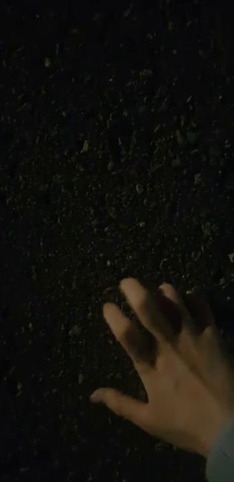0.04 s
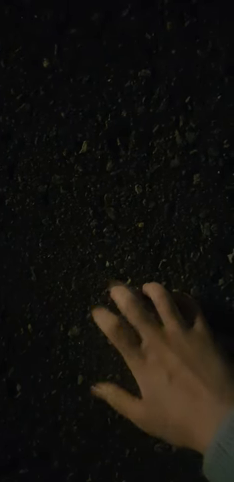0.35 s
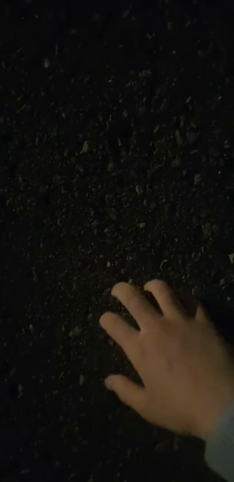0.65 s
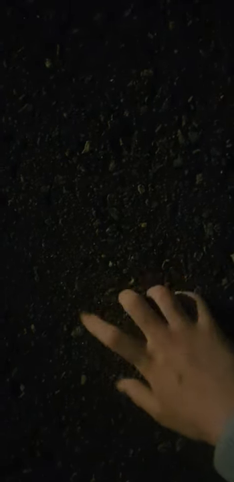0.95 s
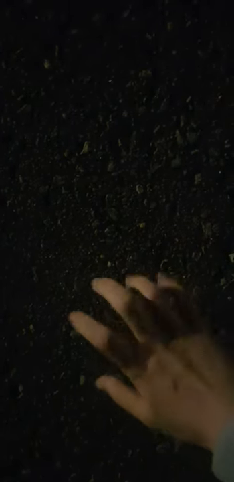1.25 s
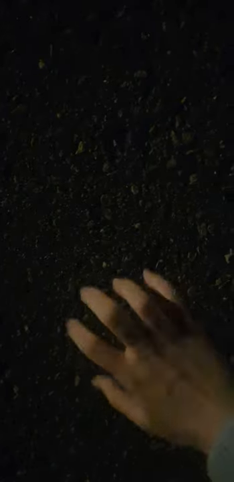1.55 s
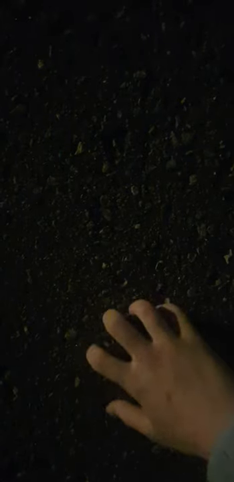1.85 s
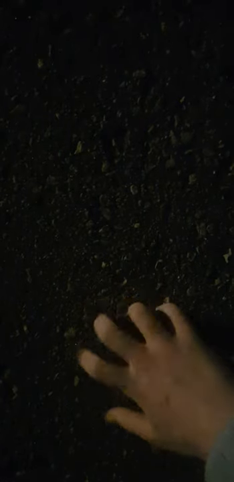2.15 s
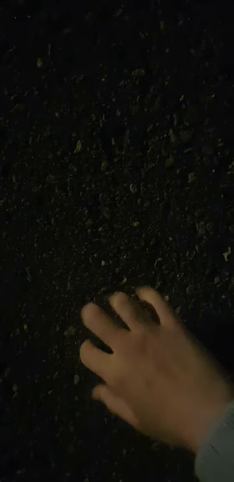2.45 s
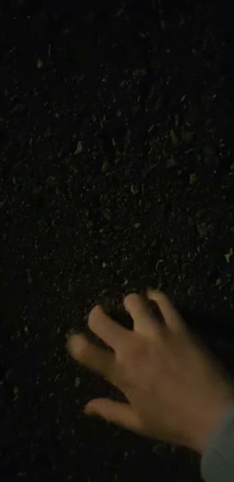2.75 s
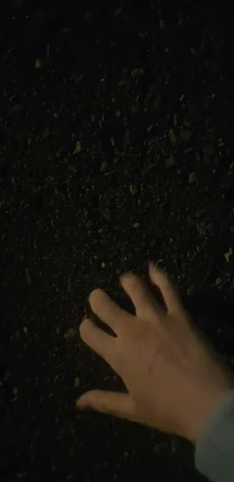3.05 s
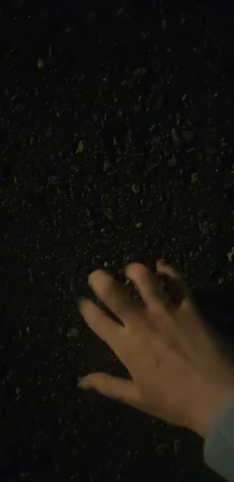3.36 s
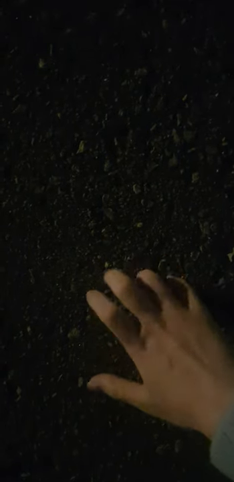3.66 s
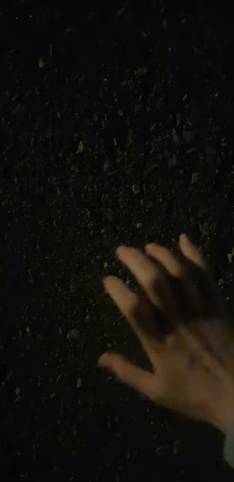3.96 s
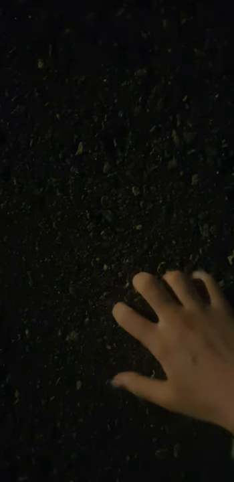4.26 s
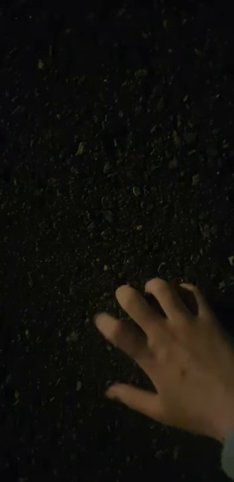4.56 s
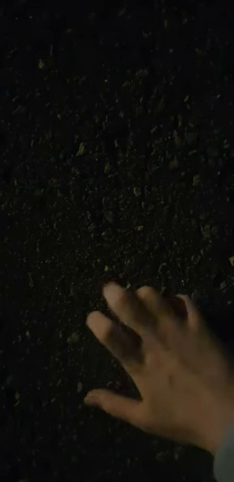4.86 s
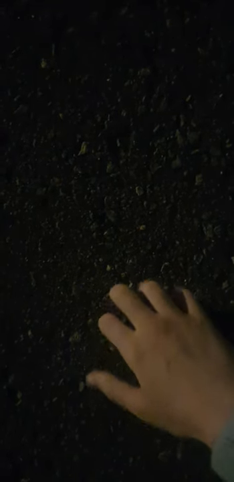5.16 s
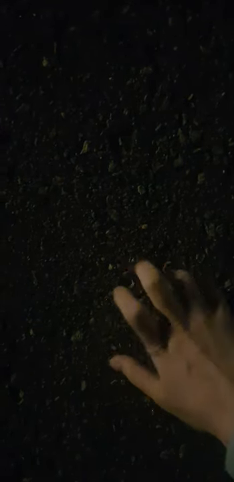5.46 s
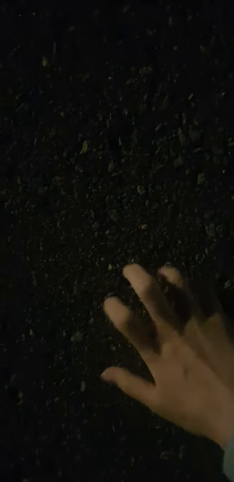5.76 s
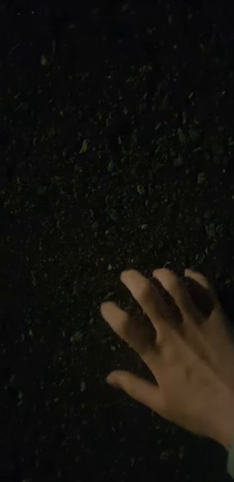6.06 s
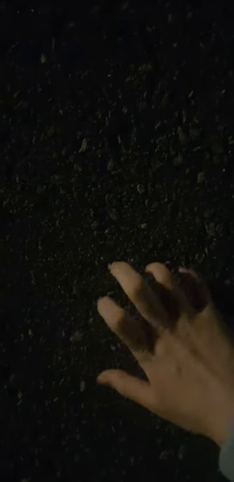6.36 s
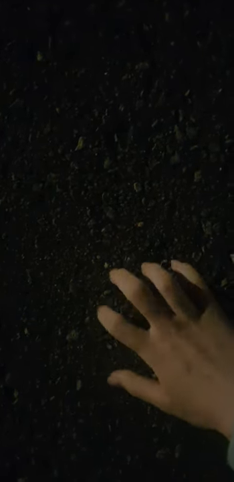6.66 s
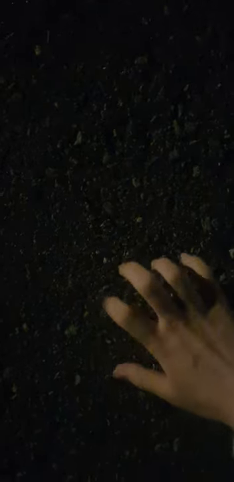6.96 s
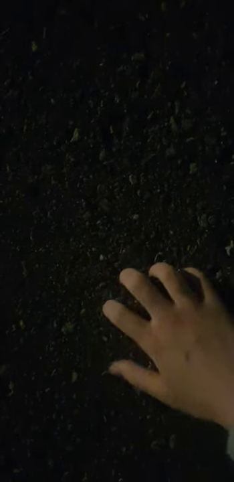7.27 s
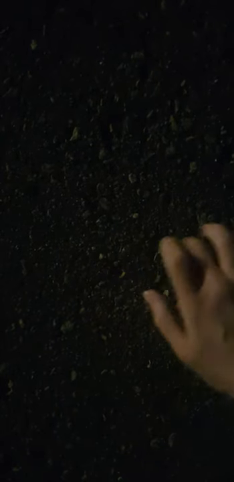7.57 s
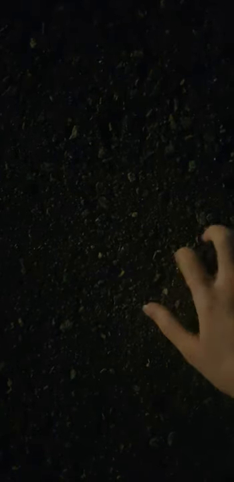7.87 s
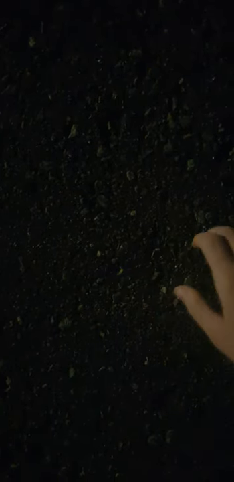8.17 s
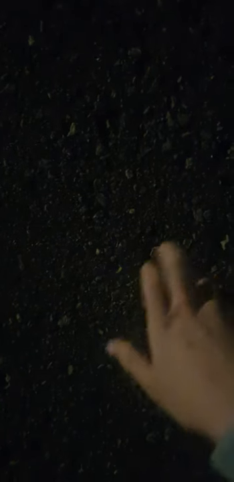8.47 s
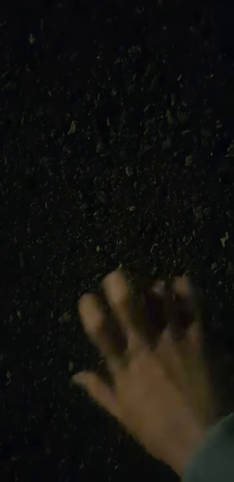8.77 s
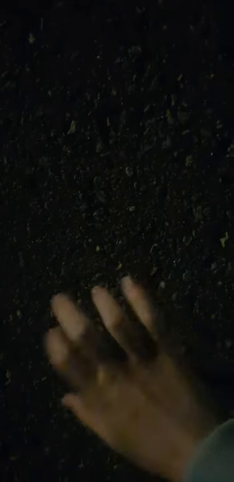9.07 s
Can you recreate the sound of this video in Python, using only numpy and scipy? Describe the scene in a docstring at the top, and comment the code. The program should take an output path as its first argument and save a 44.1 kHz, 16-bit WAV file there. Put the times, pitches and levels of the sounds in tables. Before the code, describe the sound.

Fingernails drum on rough pavement in quick little rolls, close up, while crickets chirp over a low town rumble at night.

```python
"""A low town rumble, a mains hum and a soft hiss fill the night air, with a distant insect trill.
Crickets chirp in threes over a far chorus, by stridulation: one wing's file drags over a scraper.
Almost at once, fingernails drum on rough pavement in quick rolls, close to the microphone.
Each impact gives a dull knock of the fingertip, a bright ring of the nail and a snap of grit,
followed by faint reflections from the yard."""
import sys
import numpy as np
from scipy import signal
from scipy.fft import rfft, irfft
from scipy.io import wavfile

SR = 44100
rng = np.random.default_rng(int(sys.argv[2]) if len(sys.argv) > 2 else 0)


def to_wav(sig):
    """Store sig (one row per channel, or 1-D mono) as 16-bit WAV at the path in sys.argv[1].

    Samples outside -1..1 are clipped; the rate is SR.
    """
    pcm = np.clip(np.atleast_2d(sig), -1, 1) * 32767
    pcm = np.round(pcm).astype(np.int16)
    wavfile.write(sys.argv[1], SR, pcm.T)  # frames by channels


N = 411012


def amp(db):
    """Amplitude ratio of a level in decibels."""
    return 10 ** (np.asarray(db) / 20)


def unit_rms(x):
    """Normalisation to a mean power of 1."""
    return x / np.sqrt(np.mean(np.abs(x) ** 2) + 1e-20)


def spectrum_at(points, hz, column=1):
    """Interpolation of a spectrum table on a log-frequency axis."""
    table = np.transpose(points)
    return np.interp(np.log(hz + 1), np.log(table[0] + 1), table[column])


def add(mix, onset, sound):
    """Superposition: a stereo sound joins the mix at its onset, in seconds."""
    start = round(onset * SR)
    sound = sound[:, max(-start, 0):]
    part = mix[:, max(start, 0):][:, :sound.shape[1]]
    part += sound[:, :part.shape[1]]


def drift(rate_hz, size):
    """Random modulation: low-passed Gaussian noise of rms 1."""
    hz = np.fft.rfftfreq(size, 1 / SR)
    return unit_rms(irfft(rfft(rng.standard_normal(size)) * np.exp(-(hz / rate_hz) ** 2), size))


def panned(db):
    """Constant-power panning: two gains, the left db above the right."""
    return unit_rms(amp([[db / 2], [-db / 2]]))


# Spectral densities of the town's rumble and the night's hiss: f/Hz, left level/dB, right level/dB
TOWN_RUMBLE = [(15.1, -110, -110), (28, -90.5, -92), (41, -85, -85), (56.7, -75, -74), (84.5, -72.5, -71.5),
               (103, -75, -75), (150.5, -74.5, -74), (254, -81, -79.5), (437, -93.5, -83.5),
               (487, -95, -90), (696, -104, -104), (1040, -112, -112), (3000, -130, -130)]
AIR_HISS = [(520, -125, -125), (1090, -113, -113), (1660, -112, -114), (2500, -111, -114),
            (2570, -115, -117), (3480, -121, -122), (4110, -108, -111), (4500, -104, -103),
            (4900, -103, -107), (5620, -120, -125), (7250, -127.5, -130), (8800, -131, -133),
            (10560, -125, -127), (11200, -118, -118), (15800, -117.5, -117.5), (16050, -145, -145)]
# Likeness of the two channels: f/Hz, correlation (0 to 1)
COHERENCE = [(50, 0.95), (250, 0.96), (420, 0.82), (600, 0), (1200, 0), (8000, 0.02)]


def ambient_noise(spectrum, swell_db):
    """Partial coherence: gently swelling noise, alike in both channels only in the bass."""
    hz = np.fft.rfftfreq(N, 1 / SR)
    common, independent = rfft(rng.standard_normal((2, N))) * np.sqrt(SR / 2)
    coherence = np.clip(spectrum_at(COHERENCE, hz), -1, 1)
    blend = coherence * common + np.sqrt(1 - coherence ** 2) * independent
    left = common * amp(spectrum_at(spectrum, hz, column=1))
    right = blend * amp(spectrum_at(spectrum, hz, column=2))
    return irfft(np.array([left, right]), N) * amp(swell_db * drift(14, N))


# Tones of far machines: f/Hz, level/dB
HUM_TONES = [(56, -63.5), (120.5, -58.5), (576.3, -82)]


def machine_hum(waver_db=3.5, wander_hz=1.287):
    """Amplitude and frequency modulation: low machine tones waver with distance."""
    out = np.zeros(N)
    for hz, db in HUM_TONES:
        cycles = np.cumsum(hz + wander_hz * drift(4.1, N)) / SR
        out += amp(db + waver_db * drift(3.55, N)) * unit_rms(np.sin(2 * np.pi * cycles))
    return out


# Envelope of the far insect trill: t/s, relative level/dB
TRILL_ENVELOPE = [(0, -80), (2.6, -84), (3.1, -76.5), (3.9, -84.5), (4.4, -79.5), (5.3, -83.5), (5.9, -80),
                  (7, -77.5), (9.3, -85.5)]


def insect_trill(centre_hz=2080, wander_hz=45, spread_hz=190, gain_db=-2):
    """Narrow-band noise: very distant insects merge into one soft band that wanders in pitch."""
    carrier = np.exp(2j * np.pi * np.cumsum(centre_hz + wander_hz * drift(.6, N)) / SR)
    baseband = np.array([drift(spread_hz, N) + 1j * drift(spread_hz, N) for channel in range(2)])
    level_db = gain_db + np.interp(np.arange(N) / SR, *np.transpose(TRILL_ENVELOPE))
    return panned(7.2) * amp(level_db) * (baseband * carrier).real


def wing_stroke(db, hz, fall_hz, length_s):
    """Stridulation, as a complex tone: the file slows on the scraper, so the pitch droops at the end."""
    size = int(length_s * SR)
    pitch_hz = hz - fall_hz * np.linspace(0, 1, size) ** 3.2 + 24 * drift(250, size)
    envelope = signal.windows.tukey(size, .6) * (1 + .17 * drift(350, size))
    return amp(db) * unit_rms(envelope * np.exp(2j * np.pi * np.cumsum(pitch_hz) / SR))


# Each cricket's base song: level/dB, f/Hz, pitch fall/Hz, stroke length/s, spacing ratio, left-right/dB
NEAREST = (-49, 4330, 660, .037, 1.0, 13)
SLOW = (-53.6, 4460, 450, .028, 1.1, 2)
FAINT_LOW = (-62.5, 4270, 380, .026, 1.0, 4)
FAINT_HIGH = (-61.5, 4850, 420, .028, 1.0, 4)
# When each one chirps: cricket, list of t/s of each chirp's last stroke
CHIRP_TIMES = [(NEAREST, [.824, 1.58, 2.3, 3.484, 4.147, 5.1, 6.017, 6.728, 7.305, 8.527, 9.117]),
               (SLOW, [1.367, 4.659, 6.315, 8.733]),
               (FAINT_LOW, [.049, .936, 1.71, 2.03, 2.721, 3.68, 5.615, 7.086, 8.08]),
               (FAINT_HIGH, [0.941, 2.464, 3.987, 5.211, 6.337, 7.776, 9.03])]
# The three strokes of a chirp: t/s before the last, relative level/dB, pitch ratio, length ratio
CHIRP_STROKES = [(.102, -3.3, .975, .76), (.058, 0, .995, .94), (0, .5, 1, 1)]


def crickets(rise_db_per_s=0.17):
    """Level and phase differences set four crickets apart in direction; all grow slowly louder."""
    out = np.zeros((2, N))
    for (db, hz, fall_hz, length_s, spacing, side_db), times in CHIRP_TIMES:
        direction = panned(side_db) * np.exp([[0], [-.15j * side_db]])
        for last_s in times:
            chirp_db = db + rise_db_per_s * (last_s - N / SR / 2)
            for lead_s, stroke_db, pitch, stretch in CHIRP_STROKES:
                droop_hz = fall_hz * stretch ** 2  # short strokes droop less
                tone = wing_stroke(chirp_db + stroke_db, hz * pitch, droop_hz, length_s * stretch)
                add(out, last_s - lead_s * spacing, (direction * tone).real)
    return out


def cricket_chorus(count=300, low_hz=4420, high_hz=4710, high_db=-4, level_db=-69, swell_db=1.3):
    """Incoherent summation: many far chirps around two pitches merge, blurred by the yard."""
    out = np.zeros((2, N))
    times = (np.arange(count) + rng.random(count)) * (N / SR + CHIRP_STROKES[0][0]) / count
    for k, (last_s, (nearness, detune, side)) in enumerate(zip(times, rng.standard_normal((count, 3)))):
        hz, db = (high_hz, high_db) if k % 4 == 0 else (low_hz, 0)
        for lead_s, stroke_db, pitch, stretch in CHIRP_STROKES:
            tone = wing_stroke(db + stroke_db + 2 * nearness, (hz + 95 * detune) * pitch,
                               fall_hz=300, length_s=.024 * stretch)
            add(out, last_s - lead_s, panned(4 * side) * tone.real)
    blurred = unit_rms(0.99 * out + yard(out, t60=0.36))
    return panned(8.5) * amp(level_db + swell_db * drift(0.49, N)) * blurred


def yard(x, t60, build_s=0.014, echoes_per_s=4000):
    """Reverberation: echoes scattered by walls and plants build up, then decay exponentially."""
    t = np.arange(SR // 2) / SR
    echoes = rng.standard_normal((2, len(t))) * (rng.random((2, len(t))) < echoes_per_s / SR)
    echoes *= (1 - np.exp(-t / build_s)) * np.exp(-np.log(1000) * t / t60)
    echoes /= np.linalg.norm(echoes, axis=1, keepdims=True)
    return signal.fftconvolve(x, echoes, axes=1)[:, :N]


def minimum_phase(gain):
    """Minimum-phase response: the shortest causal click with this magnitude spectrum."""
    log_gain = np.log(np.maximum(np.r_[gain, gain[-2:0:-1]], 1e-5))
    return np.fft.ifft(np.exp(np.conj(signal.hilbert(log_gain)))).real


def impact(gain, db, grains, skid_s, width):
    """Source and filter: a blow and a skid over stone grains, shaped by gain; db is the level over 3 ms."""
    t = np.arange(128) / SR
    skid = rng.standard_normal((3, len(t))) * np.exp(-t / skid_s)
    skid /= np.linalg.norm(skid, axis=1, keepdims=True)
    force = (t == 0) + grains * skid[0] + width * skid[1:]  # each channel hears the grains differently
    click = signal.fftconvolve(force, minimum_phase(gain)[None], axes=1)
    power = (click ** 2).sum() / 2 / (.003 * SR)
    return amp(db) * click / np.sqrt(power)


def bright_level(law, force_db, nail_db, usual_force_db=-52):
    """Power law: the level of a ring or snap is linear in the force and nail share, both in dB."""
    offset_db, per_nail, per_force = law
    return force_db + offset_db + per_nail * nail_db + per_force * (force_db - usual_force_db)


# Spectra of a tap's three parts: f/Hz, relative level/dB
KNOCK_SPECTRUM = [(100, -15), (300, -3.5), (550, -2.7), (800, 1), (1050, 3.5), (1450, 0.5), (1800, -6),
                  (2100, -15), (2500, -15.5), (3100, -25.5), (5000, -59.5)]
RING_SPECTRUM = [(2800, -34), (3500, -11), (4000, -2), (4600, 2), (5800, -5.5), (7200, 0), (8000, -7.5),
                 (9000, -19), (12000, -44.5)]
SNAP_SPECTRUM = [(5000, -46.5), (8500, -1), (9800, 4), (11500, -0.5), (13500, -1), (15500, -2.2),
                 (17000, -20.5)]
# Ring and snap relative to the force level: offset/dB, dB per dB of nail, dB per dB of force
RING_LEVEL_LAW = (3.56, 0.71, -0.21)
SNAP_LEVEL_LAW = (-4.5, 1.27, 0.067)
# The nails' ring moves with the hand's posture and place: t/s, shift in f/Hz
POSTURE_SHIFT = [(0, 0), (1.4, -150), (2.2, 492), (5.8, 92), (8.1, -750), (9.3, -350)]
# Finger landings: t/s, force level/dB, nail over fingertip/dB, knock f/Hz
LANDINGS = [(0.0748, -61.5, 5, 1160), (0.0939, -58, 0.5, 1620), (0.178, -48, -1, 990),
            (0.2146, -44.5, -0.5, 1040), (0.3815, -55, -6, 1120), (0.4087, -45, -3, 1020),
            (0.4338, -49.5, 1.5, 1130), (0.9326, -62, -4, 1370), (0.941, -51, -5, 1100),
            (0.977, -48, -4, 990), (1.0452, -67.5, -2, 1200), (1.3458, -62.5, 8, 1200),
            (1.3616, -49, 1, 1110), (1.4114, -44, 0.5, 1060), (1.4367, -45.5, -1.5, 1140),
            (1.7342, -55.5, 9, 1220), (1.7382, -40.5, -1, 1130), (1.7637, -36, -3, 1140),
            (1.8124, -44, -7.5, 1160), (2.147, -52, 1.5, 1080), (2.1601, -42.5, -5.5, 1130),
            (2.1972, -38.5, -4, 1130), (2.2176, -43, -13, 1090), (2.6707, -64, 13, 1340),
            (2.6801, -44, 0.5, 1080), (2.7769, -42.5, -5.5, 1030), (2.8378, -45, -6.5, 1080),
            (2.9702, -75, 15, 1220), (2.9786, -55.5, -6.5, 1070), (3.0407, -51, 2.5, 1110),
            (3.1045, -46.5, -2, 980), (3.2291, -44, -6, 1090), (3.2681, -47.5, -2.5, 1050),
            (3.3187, -53.5, 6, 1230), (3.4426, -44, -6, 1090), (3.498, -51, 4.5, 1460),
            (3.5603, -42.5, 0.5, 1430), (3.6674, -64, -2, 930), (3.675, -54, -5.5, 940),
            (3.7483, -48, -5.5, 1040), (3.7895, -44.5, 3, 1100), (3.8362, -60, -15, 1110),
            (4.165, -41.5, -10, 1410), (4.1694, -35, -11.5, 1160), (4.2016, -40.5, 0, 1170),
            (4.5397, -54.5, 2, 1210), (4.546, -47, -12, 1090), (4.5985, -51.5, -1.5, 1260),
            (4.637, -47.5, 2, 1140), (4.8816, -53, -12, 1160), (4.8943, -47, -1.5, 1320),
            (4.934, -41.5, -0.5, 1020), (5.003, -52.5, -15, 980), (5.4994, -49, -11, 1150),
            (5.5444, -46.5, -6.5, 1420), (5.5939, -48, 1, 1240), (5.8148, -58.5, -7, 1040),
            (5.8262, -52, -11, 1370), (5.8964, -55, -6, 1070), (5.9359, -50, -3, 1070),
            (6.164, -52, -8, 1090), (6.183, -45.5, -4, 970), (6.2009, -54, 7, 1530), (6.452, -68, -2, 990),
            (6.4566, -57.5, -7, 980), (6.5117, -53, 3, 1100), (6.5432, -48.5, 3.5, 1520),
            (6.8308, -59, -10, 1100), (6.843, -49.5, -2, 1150), (6.8797, -46.5, -9.5, 1080),
            (6.9125, -47, -1, 1150), (7.1093, -53.5, -17, 1090), (7.1777, -50.5, -8.5, 1050),
            (7.2237, -54.5, 3, 1080), (7.6435, -54, -8.5, 1020), (7.7374, -47.5, -9, 1200),
            (7.8938, -45.5, -4.5, 1120), (8.0897, -46.5, 2.5, 1410), (8.5047, -67.5, -2, 1350),
            (8.6112, -55.5, 3.5, 975), (8.6462, -51, 5.5, 950), (8.8881, -53, -5, 1060),
            (8.9005, -43, -2.5, 910), (9.2146, -57, 1, 1110)]


def finger_taps(usual_knock_hz=1142, usual_ring_hz=6180, hz_per_nail_db=106, scatter_hz=150):
    """Impact excitation: the tip knocks, the nail rings, grit snaps; the nail's edge rings higher."""
    out = np.zeros((2, N))
    hz = np.fft.rfftfreq(1024, 1 / SR)
    snap_gain = amp(spectrum_at(SNAP_SPECTRUM, hz))
    for (onset, force_db, nail_db, knock_hz), detune in zip(LANDINGS, rng.standard_normal(len(LANDINGS))):
        shifted_db = spectrum_at(KNOCK_SPECTRUM, hz * (usual_knock_hz / knock_hz) ** 1.05)
        rolloff_db = .5 * np.log2((hz + 300) / (knock_hz + 300)) ** 2
        knock_gain = amp(shifted_db - rolloff_db)
        posture_hz = np.interp(onset, *np.transpose(POSTURE_SHIFT))
        ring_hz = usual_ring_hz + posture_hz + hz_per_nail_db * nail_db + scatter_hz * detune
        resonance = 1 / np.hypot(1, (hz - ring_hz) / 750)  # half-width 750 Hz
        ring_gain = amp(spectrum_at(RING_SPECTRUM, hz)) * (0.15 + resonance)
        ring_db = bright_level(RING_LEVEL_LAW, force_db, nail_db)
        snap_db = bright_level(SNAP_LEVEL_LAW, force_db, nail_db)
        knock = impact(knock_gain, force_db + .2, grains=0.15, skid_s=0.0026, width=0.52)
        ring = impact(ring_gain, ring_db, grains=0.46, skid_s=0.00092, width=0.83)
        snap = impact(snap_gain, snap_db, grains=0.61, skid_s=0.0008, width=1.67)
        add(out, onset + .00006, panned(0.6) * knock)
        add(out, onset, panned(2.1) * ring)
        add(out, onset + .00007, panned(2.5) * snap)
    return out


# Colour of the taps' echo from the yard: f/Hz, relative level/dB
ECHO_SPECTRUM = [(400, 17), (1100, 1), (2200, 12.5), (4500, 8.5), (7000, -4.5), (10000, 3.5), (15000, 11.5)]


def tap_echo(taps, gain_db=-19):
    """Frequency-dependent reflection: the yard returns a faint, coloured copy of the taps."""
    colour = amp(spectrum_at(ECHO_SPECTRUM, np.fft.rfftfreq(N, 1 / SR)))
    coloured = irfft(rfft(taps) * colour, N)
    return amp(gain_db) * panned(1.5) * yard(coloured, t60=0.23)


def scene(chirp_echo_db=-15):
    """Superposition of taps, chirps and their echoes on the steady sounds of the night."""
    taps, chirps = finger_taps(), crickets()
    echoes = tap_echo(taps) + amp(chirp_echo_db) * yard(chirps, t60=0.36)
    town = ambient_noise(TOWN_RUMBLE, swell_db=.5) + machine_hum()
    far_insects = cricket_chorus() + insect_trill()
    hiss = ambient_noise(AIR_HISS, swell_db=1.7)
    return town + hiss + far_insects + chirps + taps + echoes


def record(dry, cutoff_hz=16700):
    """Band limiting: a linear-phase low-pass filter removes the highest treble."""
    lowpass = signal.firwin(511, cutoff_hz, window=("kaiser", 9), fs=SR)
    return signal.oaconvolve(dry, lowpass[None], "same")


dry = scene()
out = record(dry)
to_wav(out)
```